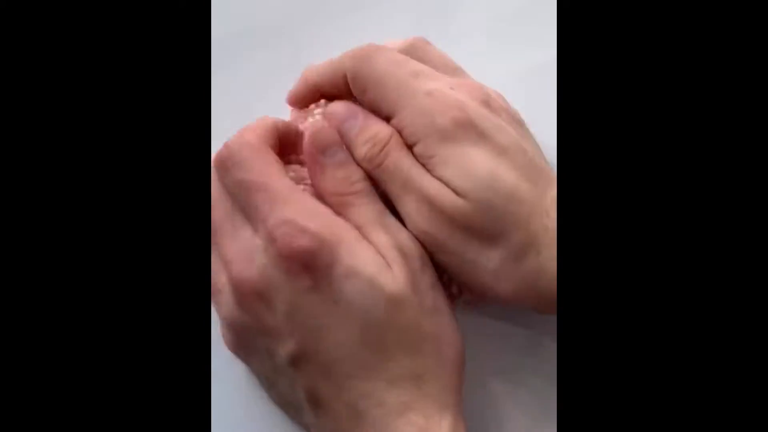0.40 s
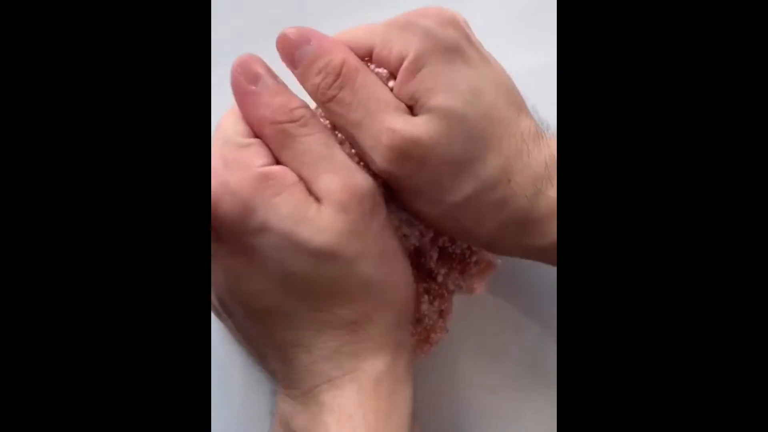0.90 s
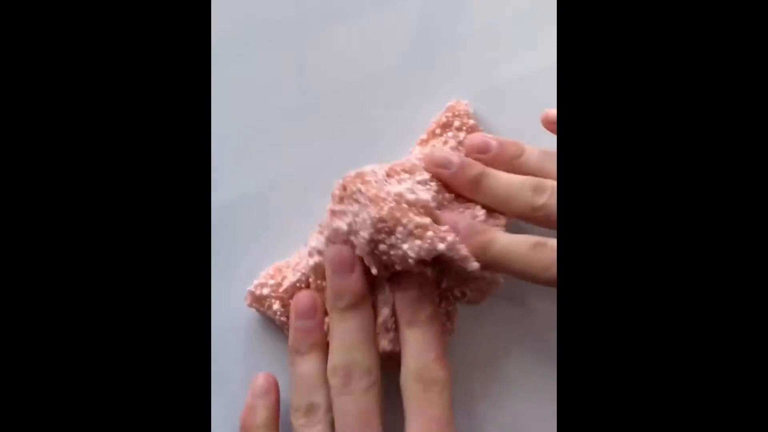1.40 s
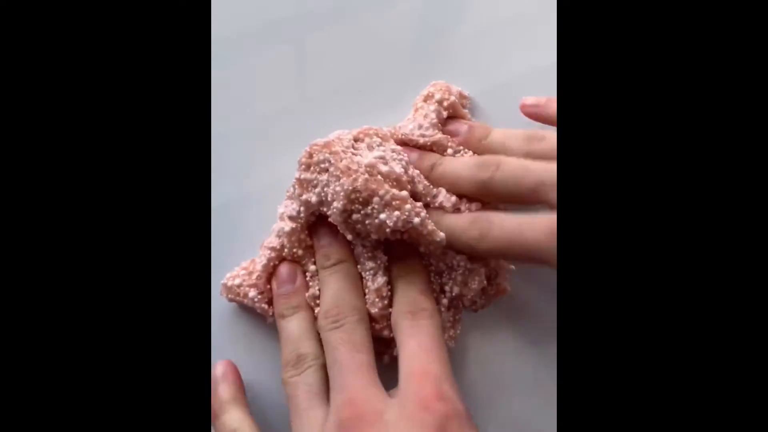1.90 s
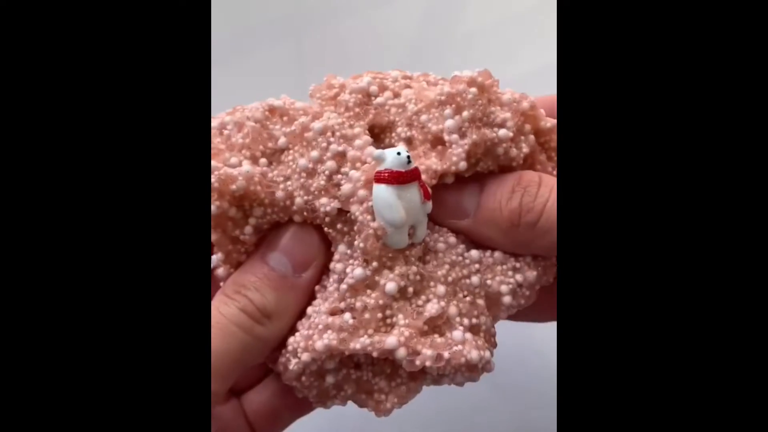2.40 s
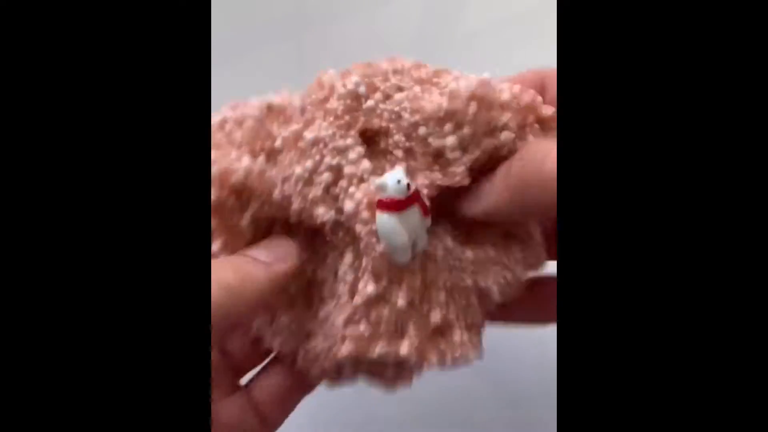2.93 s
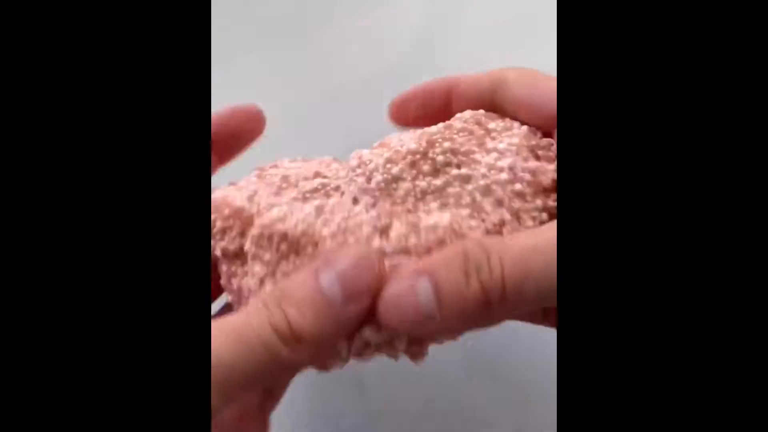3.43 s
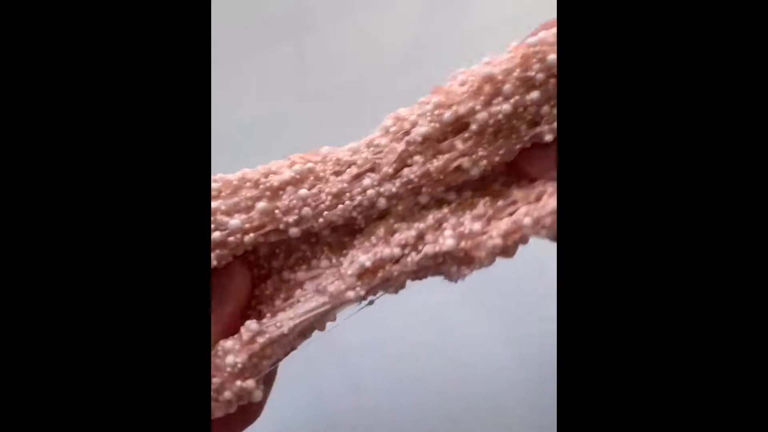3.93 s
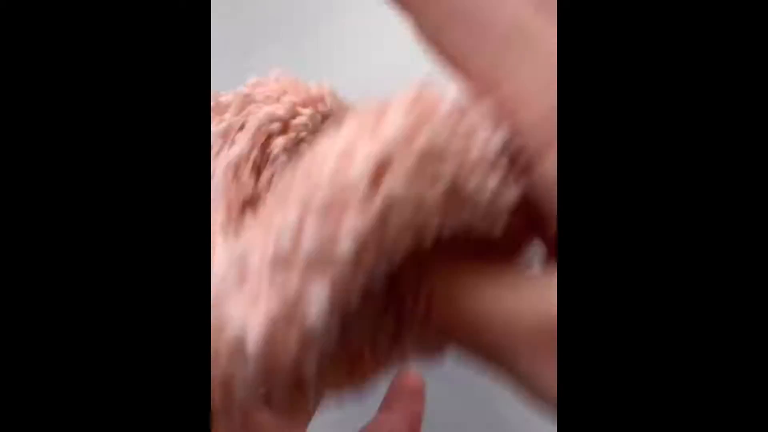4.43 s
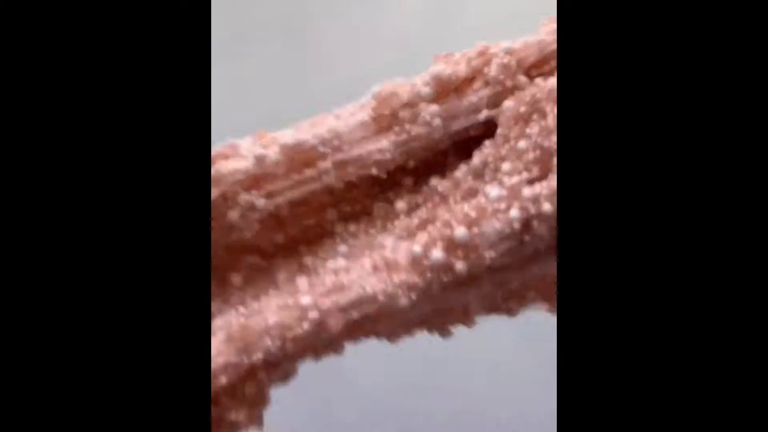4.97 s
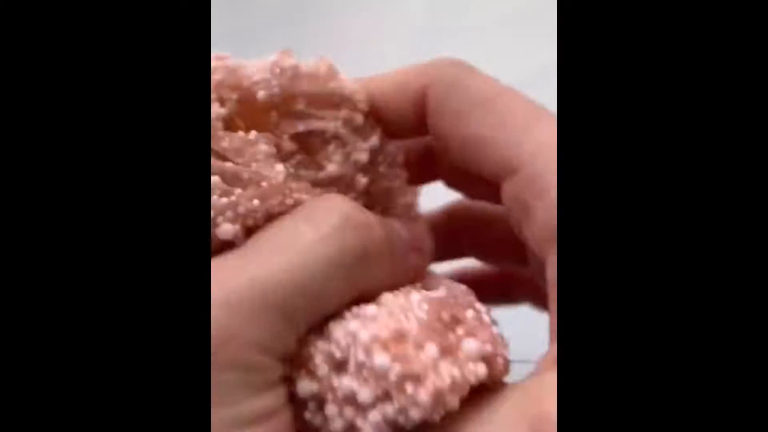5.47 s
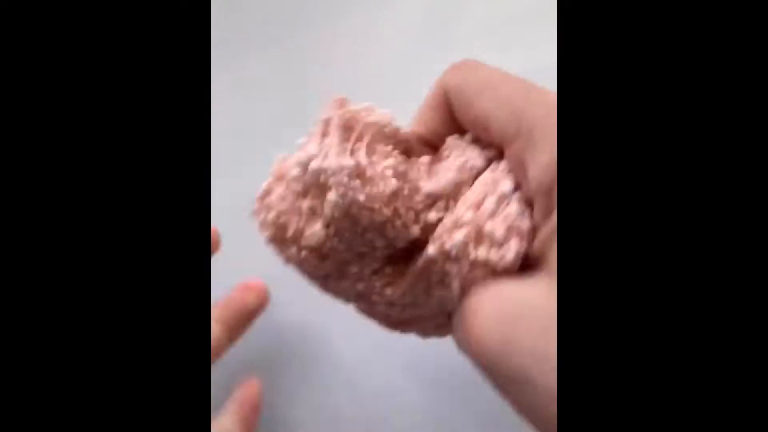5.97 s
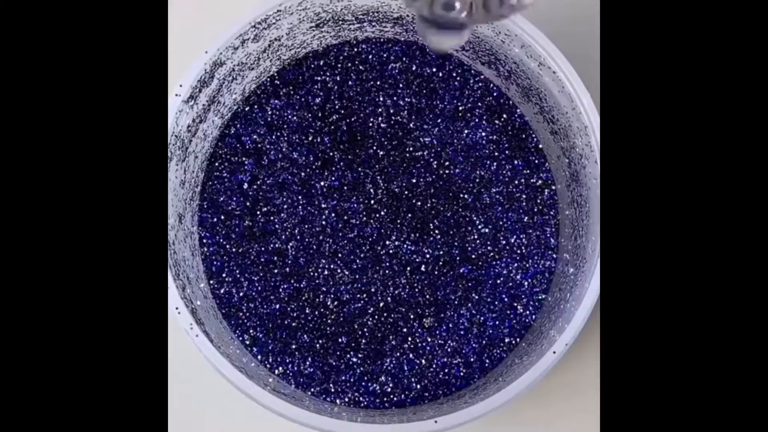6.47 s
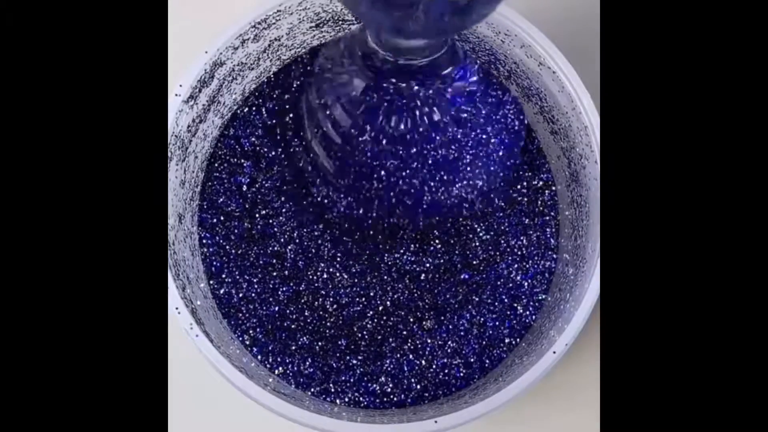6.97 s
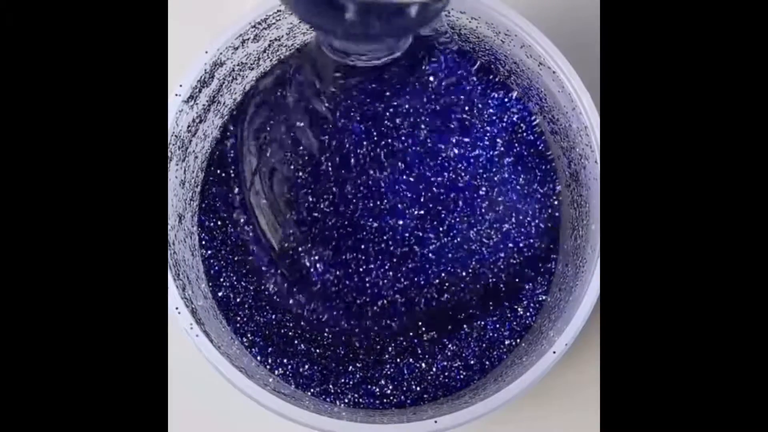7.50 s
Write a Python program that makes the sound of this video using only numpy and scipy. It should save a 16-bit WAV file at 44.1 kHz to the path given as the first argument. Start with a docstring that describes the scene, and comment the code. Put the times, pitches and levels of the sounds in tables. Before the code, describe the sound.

Very close, dry stereo in a quiet room with faint low rumble and slight hiss. At 0-0.3 s a wet, squelchy press with fine bead crackle and a few snaps, then near quiet. From 0.5 s a squeeze grows into dense, bright crunching, loudest at 0.8-1.05 s, with sharp cracking pops; a softer wet rustle follows at 1.2 s. Lighter pressing and scattered pops run from 1.4 to 2 s, then small wet touches and sparse tiny ticks until 3 s. At 3.1 s an abrupt crisp crunch, then handling. From 3.5 to 5.4 s stretching gives continuous fine crackle peppered with little pops. At 5.6-5.7 s hard snaps burst out, with more crunch and pops at 6-6.2 s. A short silence lasts until about 6.4 s; room rumble returns and a soft, muffled gel dip and low thud sound near 6.55 s, then only quiet room tone remains to the end.

```python
"""Hands squeeze, fold and stretch slime packed with foam beads close to a spaced pair of microphones.
Rubbing beads and tearing films are crowds of tiny ringing grains; trapped air pops in short noise bursts.
The wet mass squelches in lower grains and rings the table top; a quiet room adds rumble and hiss as shaped noise.
The sound fades out, stays silent for a moment and returns on the room, where a ladle dips into a tub:
two swells of low noise."""
import sys
import numpy as np
from scipy import signal
from scipy.fft import rfft, irfft, next_fast_len
from scipy.io import wavfile
from scipy.ndimage import uniform_filter1d, map_coordinates

SR = 44100
rng = np.random.default_rng(int(sys.argv[2]) if len(sys.argv) > 2 else 0)


def volts(x):
    """Linear amplitude factor 10**(x/20) for a level x in dB, scalar or array-like."""
    e = np.asarray(x, float) / 20
    return 10 ** e


def store_pcm(level_fs):
    """Save levels as 16-bit WAV."""
    pcm = np.round(np.clip(level_fs, -1, 1) * 32767).astype(np.int16)
    wavfile.write(sys.argv[1], SR, np.atleast_2d(pcm).T)


N = 336022


def unit(x):
    """Scaled to rms 1."""
    return x / np.sqrt(np.mean(x ** 2) + 1e-20)


def along(points, hz):
    """(hz, value) points read on a log frequency axis."""
    f, v = np.transpose(points)
    return np.interp(np.log(hz + 1), np.log(f + 1), v)


def curves(rows):
    """One value per sample for each column after the time."""
    s, *cols = np.transpose(rows)
    return [np.interp(np.arange(N) / SR, s, c) for c in cols]


def wobble(rate_hz):
    """Smooth random curve, rate_hz knots a second (200 at most)."""
    knots = rng.standard_normal(int(N * 200 / SR) + 4)
    return map_coordinates(knots, [np.arange(N) * min(rate_hz, 200) / SR])


def filtered(x, response):
    """x times a response of frequency."""
    m = next_fast_len(x.shape[-1] + 8192)
    spectrum = rfft(x, m) * response(np.fft.rfftfreq(m, 1 / SR))
    return irfft(spectrum, m)[..., :x.shape[-1]]


def hiss(spectrum, alike):
    """Stereo noise of rms 1 whose sides agree as far as alike says at each frequency."""
    def mid_side(hz):
        turn = np.arccos(np.clip(along(alike, hz), -1, 1)) / 2
        return volts(along(spectrum, hz)) * [np.cos(turn), np.sin(turn)]
    mid, side = filtered(rng.standard_normal((2, N)), mid_side)
    return unit(np.array([mid + side, mid - side]))


# rumble spectrum: hz, density_db [dB per Hz, relative]
ROOM_SPECTRUM = [(12, -34.5), (20, -1), (37, -2.5), (50, -5), (60, -0.5), (72, -6), (84, 1), (100, -7),
                 (128, -4.5), (145, -12.5), (182, -13.5), (322, -26), (541, -39.5), (986, -42), (1300, -73)]
# likeness of left and right: hz, likeness [-1..1]
SIDES_ALIKE = [(60, 0.98), (180, 0.96), (540, 0.65), (1610, 0.091), (4830, 0.065), (14500, 0.16)]
# rumble over time: time_s, level_db
RUMBLE_LEVEL = [(0, -48.5), (.6, -46.5), (1.9, -49), (2.6, -49.5), (3.5, -48), (6.2, -46.5), (6.45, -53),
                (7.6, -49.5)]


def room_tone():
    """Building rumble that wavers a little, a flickering low-mid band, and a steady faint hiss."""
    low_mid = [(300, -30), (430, 1), (600, -2), (850, -3.5), (1200, -29)]
    high = [(500, -17.0), (1200, 0.0), (3500, 2.0), (8000, -2.5), (11300, -3.5), (14000, -5)]
    rumble = volts(curves(RUMBLE_LEVEL)[0] + 2.5 * wobble(9)) * hiss(ROOM_SPECTRUM, SIDES_ALIKE)
    flicker = volts(-81.5 + 4 * wobble(14)) * hiss(low_mid, SIDES_ALIKE)
    return rumble + flicker + volts(-78.0) * hiss(high, SIDES_ALIKE)


def crackle(spectrum, count, cycles, spread_db, clump_db, clump_rate_hz, wash_db, patchy_db):
    """Tiny ringing grains, each of its own pitch, moment and place; one microphone hears it up to .3 ms early."""
    when, size, place, pitch = rng.random((count, 4)).T
    lo_hz, hi_hz = spectrum[1][0], spectrum[-2][0]
    hz = (lo_hz * (hi_hz / lo_hz) ** pitch)[:, None]
    step = np.arange(int(min(12 * SR / lo_hz, 400)))
    turns = hz * step / SR
    peak = volts(spread_db * np.minimum(-np.log(size + 1e-9), 5))[:, None]
    peak = peak * volts(along(spectrum, hz)) * hz
    phase = 2 * np.pi * (turns + place[:, None] * 7)
    ring = peak * turns * np.exp(-2 * turns / cycles) * np.sin(phase)
    at = (when * N).astype(int)[:, None] + step
    lag = np.round((place - .4) * 12).astype(int)[:, None]
    grains = [np.bincount((at + 20 + side * lag).ravel(), ring.ravel(), N)[:N] for side in (1, -1)]
    # grains too small to tell apart merge into a wash whose colour shifts in patches
    alike = [(300, 0.8), (700, 0.61), (1400, 0.34), (3000, 0.57), (9000, 0.98)]
    z = signal.stft(hiss(spectrum, alike), nperseg=256)[2]
    field = uniform_filter1d(rng.standard_normal(z.shape[1:]), size=4, axis=0)
    field = uniform_filter1d(field, size=12, axis=1)
    wash = signal.istft(z * volts(patchy_db * unit(field)), nperseg=256)[1][:, :N]
    clumps = volts(clump_db * wobble(clump_rate_hz))
    return unit(clumps * (unit(np.array(grains)) + volts(wash_db) * unit(wash)))


# resonances of the table top under the mass: center_hz, width_hz, level_db
TABLE_MODES = [(335.6, 14, 3), (542.7, 12, 5.5), (649.5, 9.9, -2), (910, 62, -2.5)]


def table(x):
    """The wet mass drives the table top, which rings at its own pitches."""
    def response(f):
        total = 0
        for k, (center_hz, width_hz, level_db) in enumerate(TABLE_MODES):
            damping = 1j * f * width_hz
            total = total + (-1) ** k * volts(level_db) * damping / (center_hz ** 2 - f * f + damping)
        return total
    return unit(filtered(x, response))


LAG_S, LAG_SCATTER_S = .00023, .00004  # the nearer microphone hears a pop or tick this much earlier; pops scatter
# click spectrum: hz, density_db [dB per Hz, relative]
TICK_SPECTRUM = [(1200, -25.5), (2000, -4.5), (5000, -2), (9000, 1), (12500, 1.5), (14500, -20.5)]


def ticks(count, spread_db, t60_s):
    """Single beads slip free: very short broad clicks, a few much stronger than the rest."""
    when, size, side = rng.random((count, 3)).T
    step = np.arange(96)
    click_db = spread_db * np.minimum(-np.log(size + 1e-9), 4)[:, None] - 60 * step / SR / t60_s
    click = rng.standard_normal((count, 96)) * volts(click_db)
    at = (when * N).astype(int)[:, None] + step + 20
    lag = np.round(np.where(side < .3, -.5, .5) * LAG_S * SR).astype(int)[:, None]
    pair = [np.bincount((at + sign * lag).ravel(), click.ravel(), N)[:N] for sign in (1, -1)]
    return unit(filtered(np.array(pair), lambda hz: volts(along(TICK_SPECTRUM, hz))))


# HUSH_OVER_DB: pop over rubbing at which the dip is half deep; HUSH_S: from pop to deepest point
HUSH_DB, HUSH_S, HUSH_OVER_DB = -12, .008, 17


def hush(rub_db):
    """Gain that dips for a moment before and after each listed pop that stands well over the rubbing."""
    at = (np.array(POP_ROWS)[:, 0] * SR).astype(int)
    depth = np.clip((np.array(POP_ROWS)[:, 1] - rub_db[at]) / HUSH_OVER_DB - .5, 0, 1)
    window = np.tile(np.hanning(int(HUSH_S * 2 * SR)), 2)
    dips = signal.fftconvolve(np.bincount(at, depth, N), window, "same")
    return volts(HUSH_DB * np.clip(dips, 0, 1))


SHOWER_BUILD_S, SHOWER_T60_S = .0091, .07  # 60 dB rise before a pop, 60 dB fall after it


def showers(column, over_db):
    """A pop shakes beads and films loose: gain that gathers before each listed pop and dies away after it."""
    rows = np.array(POP_ROWS)
    kicks = np.bincount((rows[:, 0] * SR).astype(int), volts(rows[:, column] + over_db), N)

    def fade(x, t60_s):
        return signal.lfilter([1], [1, -volts(-60 / (t60_s * SR))], x)
    return fade(kicks, SHOWER_T60_S) + fade(kicks[::-1], SHOWER_BUILD_S)[::-1]


# hand movements: time_s, rub_db [beads], wet_db [squelch]
KNEAD_LEVELS = [(0, -52.5, -73.5), (.12, -57, -63), (.137, -54, -41), (.156, -41, -42), (.203, -30, -34.5),
                (.24, -42.5, -43.5), (.27, -56.5, -63), (.377, -77, -66), (.48, -75, -81),
                (.536, -44, -52.5), (.724, -40.5, -44.5), (.78, -34, -41), (.83, -27, -40.5),
                (.89, -31.5, -44.5), (.922, -40, -50), (.95, -29.5, -44), (.985, -38, -63),
                (1.012, -34.5, -50), (1.022, -28.5, -53), (1.05, -34, -50.5), (1.13, -50.5, -60.5),
                (1.185, -38, -42), (1.22, -36.5, -41), (1.255, -37, -39), (1.3, -41.5, -45),
                (1.33, -41.5, -52), (1.37, -50, -58), (1.6, -41.5, -56.5), (1.71, -41.5, -57),
                (1.8, -52.5, -57), (2.03, -61.5, -64.5), (2.07, -58, -63), (2.088, -49, -45),
                (2.118, -48, -52), (2.13, -64.5, -79), (2.165, -66.5, -59), (2.19, -53, -50),
                (2.225, -62.5, -60), (2.255, -63, -57.5), (2.32, -66.5, -71.5), (2.72, -76, -79.5),
                (3.03, -76, -79), (3.09, -26.5, -51), (3.115, -29.5, -41.5), (3.16, -45.5, -54.5),
                (3.2, -43, -51), (3.25, -50.5, -58), (3.36, -48.5, -57.5), (3.48, -57.5, -69),
                (3.65, -58, -71), (3.9, -48, -63.5), (4.11, -49, -67.5), (4.27, -44, -61),
                (4.42, -50, -63.5), (4.445, -42.5, -61), (4.47, -51, -64.5), (4.58, -58.5, -67.5),
                (4.81, -42.5, -54), (5.0, -48, -60.5), (5.09, -49, -62), (5.2, -45, -59),
                (5.32, -52.5, -63.5), (5.52, -52, -71.5), (5.61, -38, -54.5), (5.69, -30, -50.5),
                (5.8, -37, -62), (5.83, -48, -64), (5.855, -33.5, -68), (5.89, -49.5, -82),
                (5.99, -34.5, -43), (6.02, -33, -40), (6.045, -35, -45), (6.08, -44, -55),
                (6.14, -53.5, -51), (6.155, -37, -59.5), (6.2, -42, -62.5)]
# offsets from the rub/wet mixes: time_s, films_db, smack_db
BLEND_LEVELS = [(0, 4.5, 4.5), (.2, -5, -6), (.4, 7, 8), (.6, 2.5, 2), (.72, 7, 7.5), (.85, 1, -1.5),
                (1.0, 1.5, -1), (1.1, -3, -5.5), (1.2, 0, 0), (1.3, -5, -7.5), (1.5, -1, -1.5),
                (1.9, 4, 4.5), (2.1, -5, -4), (2.3, -5.5, -4.5), (3.05, -12.5, 0.5), (3.3, -0.5, 0.5),
                (3.7, 2.5, 1.5), (4.1, 1.5, -3), (4.5, -1, 0), (4.9, 3, 2), (5.3, 4.5, 3.5), (5.6, 4, 3.5),
                (5.8, 1.5, -9.5), (5.95, 4.5, 2.5), (6.05, -4, -3), (6.2, 4.5, -12)]
# layer spectra: hz, density_db [dB per Hz, relative]
BEAD_SPECTRUM = [(4500, -28.5), (6000, 1), (7300, -4), (8800, 5.5), (10200, 3), (11300, -20.5), (12600, 7),
                 (14000, -12.5)]
FILM_SPECTRUM = [(1800, -23), (2500, -4.5), (3500, -1), (4300, -2), (5500, -6), (6200, -1.5), (7500, -25)]
SQUELCH_SPECTRUM = [(150, -39), (270, 0.5), (345, -8), (420, -5), (620, -3.5), (800, -3.5), (1100, -30.5)]
FILM_MIX, SMACK_MIX = 0.73, 0.6  # share of rub_db against wet_db, 0-1
SHOWER_BEADS_DB, SHOWER_FILMS_DB = -28, -18  # over a pop's bright_db, over its snap_db
TABLE_DB, SMACK_PAN_DB, TICK_DB = -3, 3.5, -5  # ring over squelch, left over right, ticks over rubbing


def kneading():
    """Beads rub past each other, films of glue tear and smack, the wet mass squelches."""
    smack_spectrum = [(550, -27.5), (800, -1.5), (1050, -5.0), (1500, -0.5), (2500, -5.5), (3200, -31.0)]
    surge_db = 1.9 * wobble(45)  # the grip slips, and all layers surge together
    beads = crackle(BEAD_SPECTRUM, count=9000, cycles=9, spread_db=3.5,
                    clump_db=3, clump_rate_hz=90, wash_db=1, patchy_db=3)
    films = crackle(FILM_SPECTRUM, count=5000, cycles=4.3, spread_db=-1.0,
                    clump_db=0.5, clump_rate_hz=80, wash_db=2.5, patchy_db=7.0)
    smack = crackle(smack_spectrum, count=3000, cycles=3.2, spread_db=1.5,
                    clump_db=1.0, clump_rate_hz=64, wash_db=1.0, patchy_db=3.5)
    squelch = crackle(SQUELCH_SPECTRUM, count=1500, cycles=2.3, spread_db=4.0,
                      clump_db=0.0, clump_rate_hz=38, wash_db=-3.5, patchy_db=-2.0)
    smack = smack * volts([[SMACK_PAN_DB / 2], [-SMACK_PAN_DB / 2]])
    squelch = unit(squelch + volts(TABLE_DB) * table(squelch))
    rub_db, wet_db = curves(KNEAD_LEVELS)
    films_over_db, smack_over_db = curves(BLEND_LEVELS)
    films_db = FILM_MIX * rub_db + (1 - FILM_MIX) * wet_db + films_over_db
    smack_db = SMACK_MIX * rub_db + (1 - SMACK_MIX) * wet_db + smack_over_db
    calm = hush(rub_db)
    loose_beads = showers(column=1, over_db=SHOWER_BEADS_DB)
    loose_films = showers(column=2, over_db=SHOWER_FILMS_DB)
    mass = (calm * volts(rub_db) + loose_beads) * beads
    mass += (calm * volts(films_db) + loose_films) * films
    mass += (calm * volts(smack_db) + volts(0.5) * loose_films) * smack
    mass += volts(wet_db) * squelch
    mass += calm * volts(rub_db + TICK_DB) * ticks(count=1800, spread_db=6, t60_s=.002)
    return volts(surge_db) * mass * (np.arange(N) < 6.3 * SR)  # stops inside the silence


# small pops: bright over rubbing; snap and hollow over bright before scatter
SMALL_DB, SMALL_SNAP_DB, SMALL_HOLLOW_DB, SMALL_SCATTER_DB = 5.5, -21.5, -29.5, 2.5
DRY_GAIN = 0.37  # dB per dB of rubbing over squelch: wet presses pop less


def small_pops(count):
    """Pop rows at random moments, strong where the rubbing is strong and dry."""
    when, pitch = rng.random((count, 2)).T
    bright, snap, hollow = SMALL_SCATTER_DB * rng.standard_normal((count, 3)).T
    start_s = .02 + when * 6.1
    rub_db, wet_db = np.array(curves(KNEAD_LEVELS))[:, (start_s * SR).astype(int)]
    level_db = rub_db + SMALL_DB + DRY_GAIN * np.clip(rub_db - wet_db, 0, 20)
    snap_hz = 1800 * 2 ** pitch
    return list(zip(start_s, level_db + bright, level_db + SMALL_SNAP_DB + snap, snap_hz,
                    level_db + SMALL_HOLLOW_DB + hollow))


# single pops: start_s, bright_db, snap_db, snap_hz, hollow_db
POP_ROWS = [(0.0402, -36, -44, 3700, -72), (0.0591, -24, -39.5, 3480, -65), (0.0787, -46.5, -46, 1700, -58),
            (0.091, -48, -45, 1690, -54), (0.191, -30, -48, 2950, -56), (0.203, -22, -42, 2940, -32),
            (0.244, -28, -58, 2200, -50), (0.33, -52.5, -56, 2130, -73), (0.5102, -48, -40, 2370, -57),
            (0.5235, -36.5, -36, 2370, -57), (0.5433, -43, -37, 1940, -45), (0.63, -24, -29.5, 3300, -55),
            (0.6898, -33, -26.5, 1910, -28.5), (0.733, -34.5, -33, 2560, -29),
            (0.752, -24.5, -49, 3400, -49), (0.765, -31.5, -31, 2100, -35), (0.7885, -25.5, -30, 1720, -26),
            (0.7972, -17, -29, 1670, -42), (0.826, -27, -39, 2040, -28.5), (0.8602, -12, -24, 3720, -53),
            (0.888, -16, -49, 2980, -51), (0.9346, -11.5, -31, 2020, -57), (0.9426, -9, -26, 3740, -40),
            (0.9571, -9.5, -40, 3580, -49), (0.993, -32, -30, 1730, -31.5), (1.0039, -4.5, -42, 2040, -38),
            (1.0198, -19.5, -41, 3650, -38), (1.1552, -36.5, -53, 2500, -46), (1.3943, -36, -56, 3050, -46),
            (1.4094, -37.5, -45, 3200, -47), (1.4488, -43.5, -44, 1840, -46),
            (1.4907, -20.5, -32.5, 2980, -59), (1.5, -31.5, -53, 2520, -61), (1.529, -34, -58, 1790, -40),
            (1.5485, -31, -42, 2470, -57), (1.575, -32, -56, 2080, -59), (1.605, -31, -34, 2500, -50),
            (1.6131, -21, -26, 2550, -31), (1.6519, -34.5, -38, 2880, -36.5), (1.6641, -22, -34, 2890, -43),
            (1.6748, -27, -30.5, 2780, -49), (1.701, -26, -31.5, 2550, -34),
            (1.7376, -27.5, -65, 2810, -64), (1.764, -34, -59, 1990, -43), (1.7984, -26, -44, 2580, -62),
            (1.831, -33, -52, 2500, -58), (1.8623, -40, -51, 2980, -49), (1.8999, -36, -54, 1740, -38),
            (1.922, -38.5, -47, 2170, -59), (1.946, -63, -47, 2330, -44), (1.9621, -26, -34, 1620, -38),
            (2.0442, -44, -45.5, 2240, -46), (2.0728, -40.5, -67, 2000, -59), (2.099, -35, -66, 1800, -54),
            (2.1797, -42, -57, 2230, -46), (2.192, -56, -62, 2000, -47), (2.2069, -38.5, -77, 2090, -49),
            (2.228, -48.5, -75, 2000, -66), (2.2437, -45, -74, 2000, -53), (2.348, -48, -82, 2050, -87),
            (2.392, -52, -60, 1700, -73), (2.4725, -47, -86, 1800, -69.5), (2.5484, -44.5, -57, 2980, -60),
            (2.6236, -51, -69, 2120, -81), (2.761, -54.5, -55.5, 2300, -68), (2.772, -52.5, -72, 3580, -74),
            (2.784, -52.5, -65, 2000, -65), (2.8655, -46.5, -58, 2660, -68),
            (2.9312, -55.5, -86, 3000, -81), (2.9667, -46.5, -63.5, 3020, -69),
            (3.026, -66, -57, 2500, -66), (3.049, -50, -49.5, 1870, -59), (3.065, -38, -51, 2160, -53),
            (3.0767, -18, -38, 1930, -47), (3.0985, -24, -58, 2850, -54), (3.1185, -8, -31.5, 2420, -60),
            (3.199, -46, -42.5, 1950, -43), (3.225, -34, -54, 2500, -56), (3.298, -39.5, -48, 2500, -47),
            (3.356, -31, -40, 2050, -63), (3.3634, -28.5, -40, 2240, -67), (3.414, -36.5, -64, 2080, -73),
            (3.462, -45, -63, 3700, -63), (3.5018, -31.5, -28.5, 2710, -43), (3.509, -33.5, -40, 3000, -50),
            (3.52, -25.5, -33, 3300, -38), (3.5322, -30.5, -38, 2550, -49), (3.54, -38, -48, 2500, -53),
            (3.576, -43.5, -59, 2500, -65), (3.6005, -38, -55, 2500, -66), (3.617, -33.5, -35, 2370, -58),
            (3.627, -37.5, -67, 2500, -69), (3.646, -48.5, -66, 2000, -65), (3.664, -35.5, -51, 2170, -73),
            (3.684, -36, -58, 3000, -68), (3.711, -41.5, -49, 2500, -66), (3.72, -29, -33, 3050, -68),
            (3.7473, -34.5, -45, 1900, -53), (3.7867, -32.5, -40, 1790, -60),
            (3.8212, -32.5, -48, 2110, -73), (3.839, -33, -62, 2200, -63), (3.862, -37, -59, 2500, -66),
            (3.886, -29, -44, 3700, -40.5), (3.9117, -26, -38, 2300, -63), (3.927, -17.5, -33, 3120, -45),
            (3.9354, -19, -32, 2080, -49), (3.9686, -29, -37, 3720, -45.5), (4.0147, -22.5, -42, 1670, -48),
            (4.0235, -26.5, -60, 3500, -48), (4.0379, -32.5, -40.5, 2090, -68),
            (4.0657, -40, -40.5, 3200, -71), (4.074, -31.5, -55, 3200, -64), (4.1043, -33, -68, 3230, -62),
            (4.1342, -34.5, -40, 3000, -67), (4.142, -30, -52, 3290, -72), (4.1673, -32, -44, 3700, -71),
            (4.186, -19, -37, 2230, -45), (4.2488, -27.5, -34, 2780, -47), (4.2864, -45.5, -61, 2270, -41),
            (4.3763, -32.5, -41, 3610, -49), (4.4466, -40.5, -39, 3690, -60), (4.5256, -47, -45, 3180, -70),
            (4.578, -40, -65, 3000, -71), (4.6264, -43, -42.5, 2970, -55), (4.6534, -42, -53, 2200, -53),
            (4.678, -43, -66, 3000, -60), (4.78, -26, -32, 3570, -51), (4.803, -39, -40, 1800, -37.5),
            (4.8242, -39, -46, 3580, -46), (4.847, -30.5, -38, 2840, -66), (4.86, -28, -36, 3480, -62),
            (4.8727, -27, -27.5, 3600, -69), (4.8986, -28, -42, 2040, -46), (4.91, -30, -52, 2800, -53),
            (4.966, -32, -52, 3200, -64), (4.979, -35, -40, 3200, -57), (5.0009, -23, -35, 2160, -46),
            (5.017, -24, -32, 3280, -53), (5.0414, -37, -48, 2500, -55), (5.053, -28, -42, 3020, -60),
            (5.0655, -24, -51, 1800, -43), (5.089, -40, -48, 2500, -64), (5.104, -36, -53, 3000, -62),
            (5.1093, -28, -44, 3420, -65), (5.1541, -35, -43, 1700, -46), (5.2754, -56, -39, 1820, -61),
            (5.2994, -30.5, -41.5, 2290, -68), (5.3343, -27.5, -43, 3830, -67),
            (5.344, -30.5, -51, 3600, -65), (5.3533, -34.5, -45, 2040, -47), (5.366, -34.5, -51, 3000, -56),
            (5.4014, -36.5, -50, 2500, -44), (5.412, -33.5, -48, 3000, -68),
            (5.4181, -19.5, -42.5, 2100, -50), (5.5286, -32, -53, 3700, -65), (5.546, -32, -47, 3200, -66),
            (5.555, -30, -59, 3260, -69), (5.5836, -28, -36, 3330, -53), (5.5983, -8, -25.5, 1640, -31),
            (5.612, -20.5, -22, 2840, -52), (5.621, -39, -25, 3600, -51), (5.648, -22.5, -28.5, 2470, -58),
            (5.663, -22, -25, 2180, -33), (5.6812, -16.5, -10, 2680, -24.5), (5.697, -7, -27, 2720, -37),
            (5.7124, -17, -55, 2890, -55.5), (5.7376, -21.5, -52, 3720, -42),
            (5.787, -26.5, -36, 3000, -48), (5.8035, -21, -36, 3430, -60),
            (5.8451, -20.5, -37.5, 1990, -67), (5.9042, -37, -39.5, 2170, -62),
            (5.9336, -34, -53, 2860, -59), (6.0852, -28, -41, 3000, -48), (6.098, -14, -34, 3460, -46),
            (6.109, -26, -40, 3200, -52), (6.115, -24, -33, 3200, -50), (6.1296, -6.5, -26.5, 3660, -31),
            (6.1502, -26, -25, 3630, -41), (6.167, -30.5, -31, 3600, -57), (6.1817, -23, -30.5, 3480, -60)]
# hollow, snap, bright: rise_s [e-fold], t60_s, rms_over_db [over the pop's dB], own_share [differs per side]
POP_PARTS = [(0.0006, 0.0096, -1.5, 0.2), (0.0012, 0.006, 1.5, 0.35), (0.0012, 0.0085, -4.5, 0.4)]
# pops from the left hand: from_s, to_s
LEFT_SPANS = [(.2, .21), (.52, .7), (.85, .87), (1.01, 1.03), (1.43, 1.5), (1.66, 1.71), (1.89, 1.91),
              (3.9, 3.92), (4.24, 4.26), (5.03, 5.105), (5.605, 5.7), (6.16, 6.2)]
BUILD_S, PRE_S = .001, .006  # first tear to peak; buffer start to peak
PAN_DB, PAN_SCATTER_DB = 1, 4.5  # left over right
CRACK = 7  # added to one noise sample, before the band filter
# the hollow and snap spread through the mass and reach both sides more nearly together
HOLLOW_LAG, SNAP_LAG = .4, .5  # share of the lag


def pops():
    """Each pop is a burst of one or two milliseconds: a hollow part, a snap around its own pitch and a bright part."""
    out = np.zeros((2, N + 2048))
    t = np.arange(1024) / SR - PRE_S
    rows = small_pops(count=110) + list(POP_ROWS)
    noise = rng.standard_normal((len(rows), 3, 3, 1024))  # pop, part, (shared, left, right), sample
    draws = rng.uniform(-1, 1, (len(rows), 2))
    noise[:, :, 0, 262] += CRACK * np.sign(noise[:, :, 0, 262])  # the film breaks in one sharp crack
    for (start_s, bright_db, snap_db, snap_hz, hollow_db), seed, (late, lean) in zip(rows, noise, draws):
        from_left = any(a < start_s < b for a, b in LEFT_SPANS)
        lag_s = LAG_SCATTER_S * late + LAG_S * (-1 if from_left else 1)
        pan_db = PAN_DB + PAN_SCATTER_DB * lean
        bands_hz = [(240, 1200), (snap_hz / 1.44, snap_hz * 1.4), (4800, 15500)]
        levels_db = [hollow_db, snap_db, bright_db]
        lag_shares = [HOLLOW_LAG, SNAP_LAG, 1]
        pop = np.zeros((2, 1024))
        for part, band_hz, level_db, raw, share in zip(POP_PARTS, bands_hz, levels_db, seed, lag_shares):
            rise_s, t60_s, rms_over_db, own_share = part
            rise = np.exp(np.minimum(t, 0) / rise_s)
            shape = np.where(t < 0, rise, volts(-60 * np.maximum(t, 0) / t60_s))
            band = signal.sosfiltfilt(signal.butter(2, band_hz, "band", fs=SR, output="sos"), raw)
            pair = shape * (band[0] + own_share * band[1:])
            pair = pair / np.sqrt(np.mean(pair[:, 200:330] ** 2))  # rms 1 around the peak
            pair = volts(level_db + rms_over_db) * pair
            shift = round(share * lag_s * SR / 2)
            pop += [np.roll(pair[0], shift), np.roll(pair[1], -shift)]
        start = round((start_s + BUILD_S - PRE_S) * SR)
        out[:, start:start + 1024] += pop * volts([[pan_db / 2], [-pan_db / 2]])
    return out[:, :N]


# room decay: hz, t60_s
WALL_DECAY = [(300, 0.064), (3000, 0.11), (12000, 0.012)]


def walls(x):
    """Each frequency of the room's answer dies at its own speed."""
    hz, t, z = signal.stft(rng.standard_normal((2, SR // 3)), SR, nperseg=256)
    decay = volts(-60 * t / along(WALL_DECAY, hz)[:, None])
    tail = signal.istft(z * decay, SR, nperseg=256)[1]
    return signal.fftconvolve(x, tail / np.linalg.norm(tail[0]), axes=1)[:, :N]


# ladle in gel: time_s, level_db
LADLE_LEVEL = [(6.44, -93.5), (6.48, -67.5), (6.52, -77), (6.535, -56), (6.57, -69.5), (6.68, -77)]
# the tub takes the weight: time_s, level_db
THUD_LEVEL = [(6.53, -90), (6.56, -50.5), (6.6, -61.5), (6.66, -83)]


def ladle():
    """A ladle sinks softly into thick gel, and the tub thuds: two bands of noise."""
    thud_spectrum = [(70, -32), (120, 1), (200, -5), (400, -12.5), (700, -44.5)]
    gel_spectrum = [(150, -35.5), (300, -8.0), (600, 0.5), (1000, -12.5), (2500, -23.5), (3500, -58)]
    thud = volts(curves(THUD_LEVEL)[0]) * hiss(thud_spectrum, SIDES_ALIKE)
    return thud + volts(curves(LADLE_LEVEL)[0]) * hiss(gel_spectrum, SIDES_ALIKE)


def scene():
    """Slime near the microphones, in the room; only the direct pops reach well above 13 kHz."""
    steady_tone = [(13200, 1.0), (13450, -64.5)]
    pop_tone = [(10000, -1.5), (13100, -2.0), (13600, -16.5), (15000, -30.0), (16500, -35.5)]
    bursts = pops()
    echo = volts(-18) * walls(bursts)
    steady = room_tone() + kneading() + echo + ladle()
    steady = filtered(steady, lambda hz: volts(along(steady_tone, hz)))
    return steady + filtered(bursts, lambda hz: volts(along(pop_tone, hz)))


def band_limit(x):
    """A steep low-pass at the top of the band."""
    return signal.sosfilt(signal.butter(12, 15070, fs=SR, output="sos"), x)


# master fader, out and in around a short silence: time_s, gain_db
FADER = [(6.19, -4), (6.215, -19.5), (6.245, -80), (6.26, -110), (6.37, -110), (6.39, -28.5), (6.42, -9),
         (6.44, -3.5)]


def record(dry):
    """The fader rides the mix, which clips at full scale."""
    mix = np.clip(dry * volts(curves(FADER)[0]), -1, 1)
    return band_limit(mix)


dry = scene()
out = record(dry)
store_pcm(out)
```